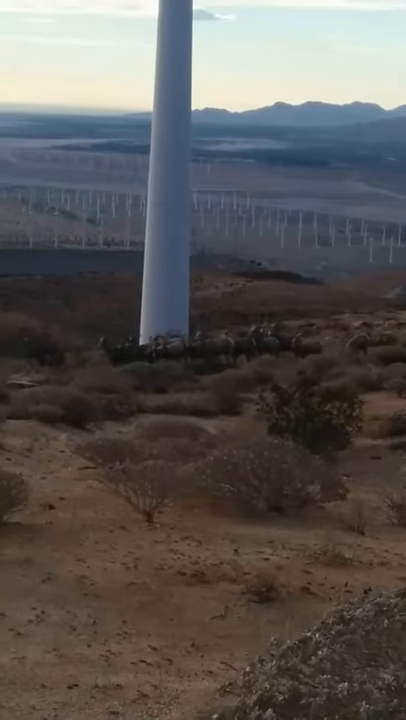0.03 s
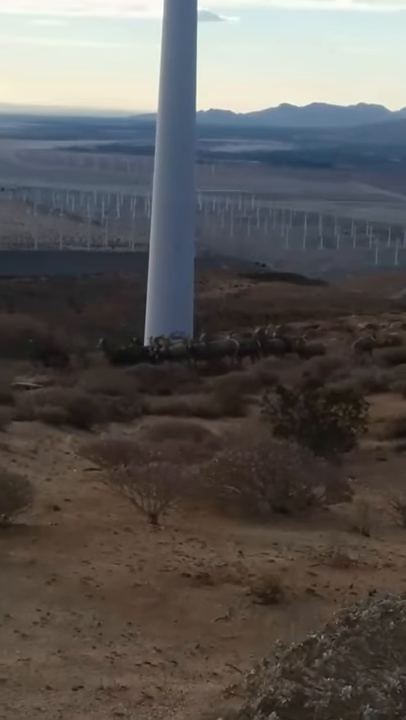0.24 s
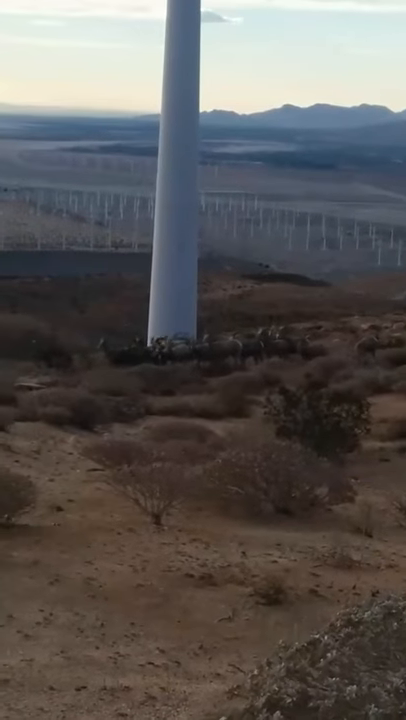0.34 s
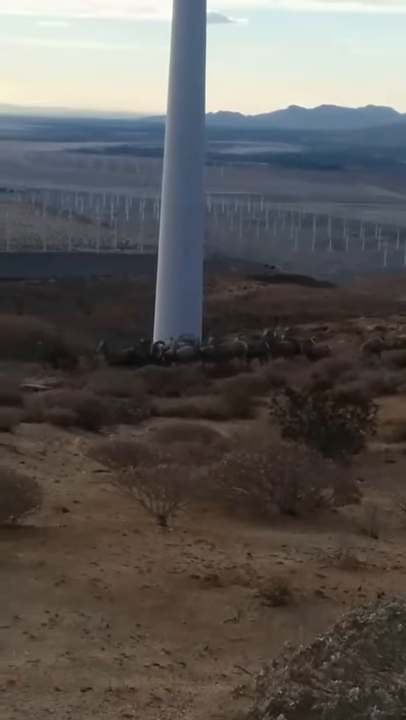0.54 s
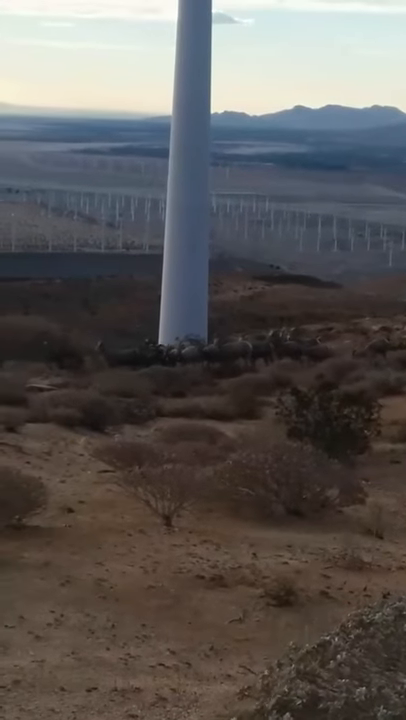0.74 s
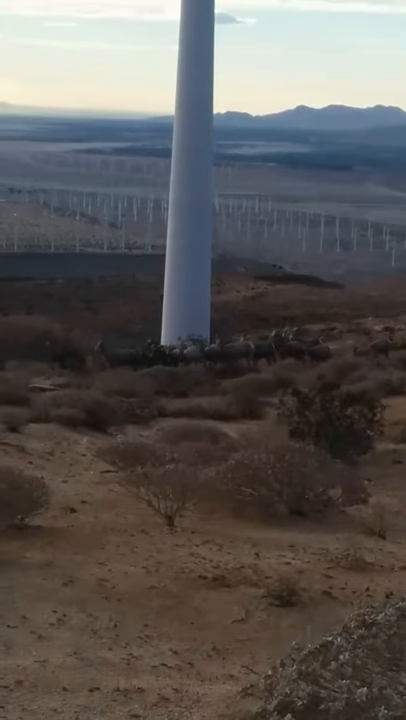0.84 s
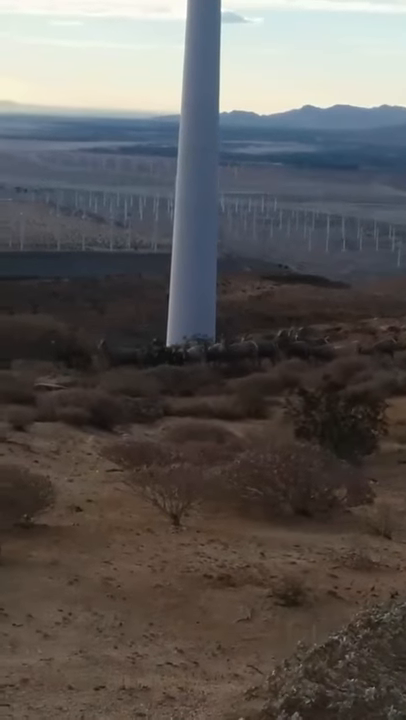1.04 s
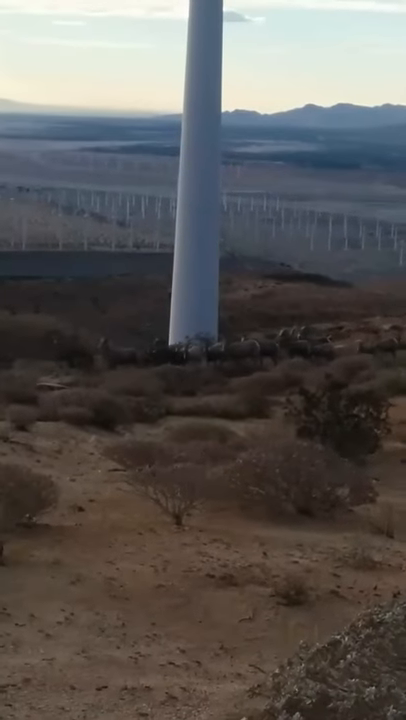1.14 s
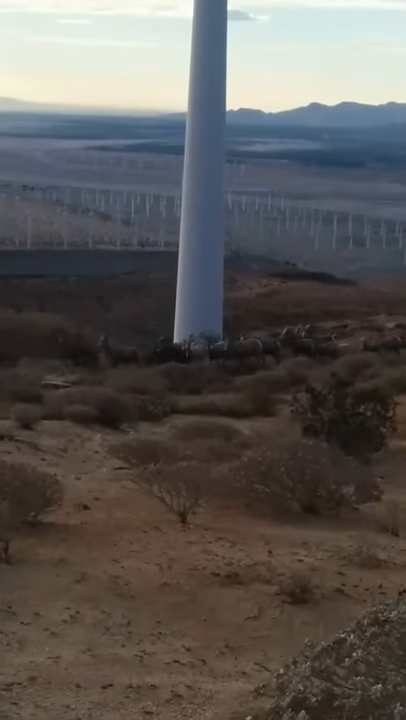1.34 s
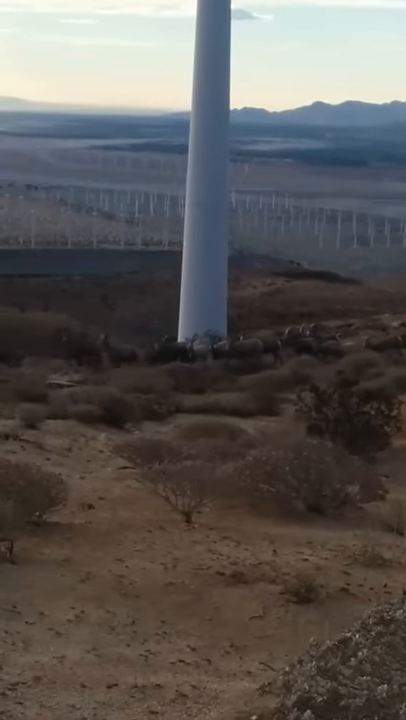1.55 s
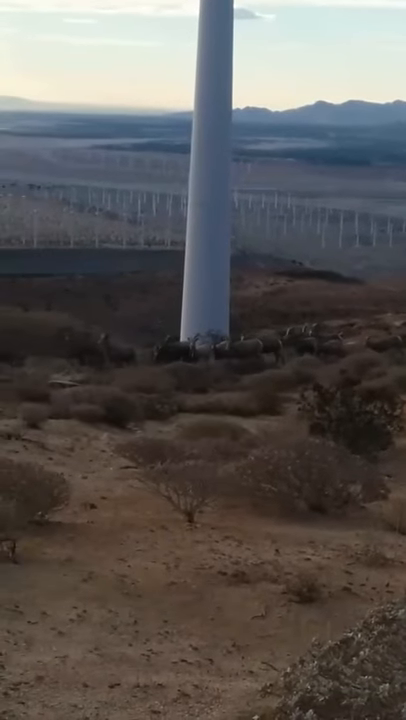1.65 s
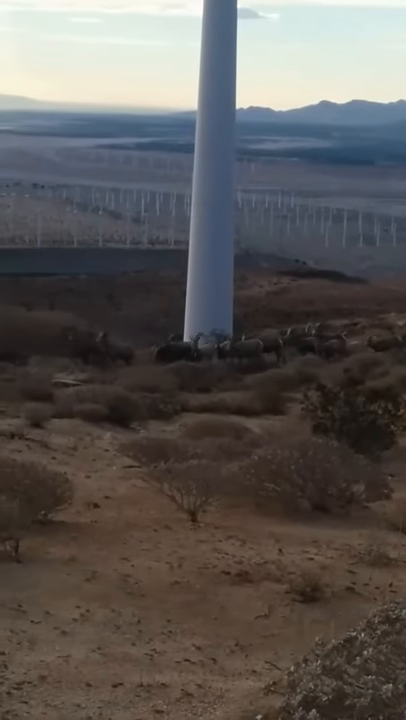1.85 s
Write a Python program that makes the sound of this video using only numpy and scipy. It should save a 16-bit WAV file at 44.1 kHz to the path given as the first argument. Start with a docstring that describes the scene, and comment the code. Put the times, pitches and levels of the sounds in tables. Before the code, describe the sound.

Wind thumps and flutters against the microphone in uneven bursts, strongest near the start. It eases briefly midway, leaving a faint rush of open desert air, then buffets again with a low rumble.

```python
"""On an open desert hillside, among wind turbines, gusty wind buffets a small microphone.
Each eddy (a little whirl of air) hits the microphone's opening with a low thump and a brief flutter;
the strong ones also rasp at its rim and raise a thin hiss. In the lulls a faint rush of distant wind
and machinery remains, with air in the dry brush and a few breathy whistles."""
import sys
import numpy as np
from scipy import signal
from scipy.fft import rfft, irfft, next_fast_len
from scipy.io import wavfile
from scipy.ndimage import uniform_filter1d

SR = 44100
rng = np.random.default_rng(int(sys.argv[2]) if len(sys.argv) > 2 else 0)


def persist_wave(psi):
    """Save psi, clipped to +-1, as 16-bit WAV."""
    counts = np.round(np.clip(psi, -1, 1) * 32767).astype(np.int16)
    wavfile.write(sys.argv[1], SR, np.atleast_2d(counts).T)


N = 83790

# eddies hitting the microphone: time_s, thump_db, flutter_db
EDDIES = [(.078, -41, -48), (.089, -31, -53), (.143, -29, -44), (.18, -33, -59), (.236, -34, -48),
          (.26, -15, -28), (.302, -23, -31), (.334, -18, -28), (.35, -26, -38), (.381, -30, -50),
          (.405, -24, -34), (.423, -32, -46), (.439, -39, -45), (.456, -39, -52), (.519, -42, -57),
          (.559, -43, -56), (.608, -47, -55), (.631, -46, -63), (.694, -36, -49), (.705, -30, -54),
          (.725, -38, -47), (.775, -24, -43), (.788, -19, -32), (.817, -32, -47), (.873, -54, -62),
          (.927, -43, -60), (.948, -49, -58), (.995, -55, -56), (1.182, -54, -55), (1.22, -46, -59),
          (1.272, -20, -44), (1.289, -28, -47), (1.333, -23, -41), (1.357, -31, -51), (1.378, -40, -55),
          (1.46, -40, -58), (1.503, -44, -53), (1.57, -21, -33), (1.597, -24, -42), (1.622, -29, -52),
          (1.728, -52, -60), (1.787, -35, -44), (1.804, -34, -50), (1.835, -32, -50), (1.88, -46, -55)]
# spectrum of the random wobble in thumps and rasps: pitch_hz, level_db
WOBBLE = [(60, 0), (160, -3), (300, -20), (1000, -90)]


def amp(db):
    """Turn decibels into a multiplier."""
    return 10 ** (np.asarray(db) / 20)


def unit(x):
    """Scale x to an average (rms) size of 1."""
    return x / np.sqrt(np.mean(x ** 2) + 1e-20)


def filtered(x, response):
    """Multiply each frequency in x by response(hz)."""
    size = next_fast_len(N + 8192)
    return irfft(rfft(x, size) * response(np.fft.rfftfreq(size, 1 / SR)), size)[:N]


def coloured(x, spectrum):
    """Shape x with (pitch_hz, level_db) points, then scale it to size 1."""
    pitch_hz, level_db = np.transpose(spectrum)
    return unit(filtered(x, lambda hz: amp(np.interp(np.log(hz + 1), np.log(pitch_hz), level_db))))


def noise(spectrum):
    """Steady noise with the given spectrum."""
    return coloured(rng.standard_normal(N), spectrum)


def patchy(spectrum, depth_db):
    """Noise whose level drifts in patches of time and pitch."""
    grid = signal.stft(rng.standard_normal(N), nperseg=1024)[2]
    patches = uniform_filter1d(rng.standard_normal(grid.shape), size=5, axis=0)
    patches = uniform_filter1d(patches, size=7, axis=1)
    uneven = signal.istft(grid * amp(depth_db * unit(patches)), nperseg=1024)[1][:N]
    return coloured(uneven, spectrum)


def swells(times, levels_db, rise_s, fall_s, lead_s, wake_db, wake_s):
    """Loudness of passing eddies: each swells, falls quickly and leaves a weaker tail, its wake."""
    age = np.arange(N) / SR - times[:, None] + lead_s
    before, after = np.minimum(age, 0), np.maximum(age, 0)
    rise = np.exp(1 - np.hypot(1, before / rise_s * 2))
    fall = np.exp(1 - np.hypot(1, after / fall_s))
    wake = amp(wake_db) * np.exp(-after / wake_s)
    each = amp(levels_db)[:, None] * rise * np.maximum(fall, wake)
    return np.sqrt(np.sum(each ** 2, axis=0))


def breeze():
    """Distant wind and machinery, air in dry brush and a rumble of small eddies rise and fall together."""
    # strength of the breeze: time_s, level_db
    strength = [(0, .5), (.2, 1), (.45, 3), (.6, 1.5), (.67, -.5), (.93, .5), (1.06, -2.2), (1.22, -1.5),
                (1.4, 2), (1.5, 1.5), (1.72, .5), (1.83, 2.5), (1.9, 2.5)]
    # spectra of the three sounds: pitch_hz, level_db
    distant_spectrum = [(25, -19), (60, -12), (150, -6), (280, 3), (400, -8), (550, -6), (750, -9),
                        (980, -10.5), (1180, -21), (1500, -17), (2050, -24), (2500, -25), (3000, -31),
                        (4200, -40), (8000, -70)]
    brush_spectrum = [(1500, -30), (2150, -12), (2400, 0), (2650, -1), (2950, -5), (3200, -12), (3800, -15),
                      (4500, -30)]
    rumble_spectrum = [(25, -15), (45, -3), (85, 0), (170, -2), (260, -4), (370, -12), (490, -11),
                       (650, -24), (1000, -50), (2500, -100)]
    strength_db = np.interp(np.arange(N) / SR, *np.transpose(strength))
    distant = amp(-62.7) * patchy(distant_spectrum, depth_db=3.5)
    brush = amp(-81.5) * patchy(brush_spectrum, depth_db=4.5)
    rumble = amp(-61 + 3.2 * strength_db) * noise(rumble_spectrum)
    return amp(strength_db) * (distant + brush) + rumble


def thumps():
    """Each eddy makes a few uneven swings of pressure, fast at its front and slow in its wake."""
    wake_hz, slowing_s, top_hz = 88, .009, 290
    t, out = np.arange(N) / SR, np.zeros(N)
    for time_s, thump_db, flutter_db in EDDIES:
        front_hz = 162 * 2 ** ((flutter_db - thump_db + 14) / 36)  # brighter eddy, faster front
        front_share = (1 - np.tanh((t - time_s) / slowing_s + 1 / 4)) / 2
        rate_hz = wake_hz + (front_hz - wake_hz) * front_share
        turns = np.cumsum(rate_hz * np.exp(.37 * noise(WOBBLE))) / SR + rng.random()
        loudness = swells(np.array([time_s]), thump_db + np.array([.9]),
                          rise_s=.0062, fall_s=.0075, lead_s=.003, wake_db=-20, wake_s=.028)
        out += loudness * np.sqrt(2) * np.sin(2 * np.pi * turns)
    return filtered(out, lambda hz: 1 / np.sqrt(1 + (hz / top_hz) ** 12))


def flutter():
    """Each eddy briefly shakes the pressure at an uneven rate."""
    # spectrum of the flutter: pitch_hz, level_db
    spectrum = [(100, -25), (165, -2), (230, 2), (330, -1), (385, -14), (480, -10), (620, -19), (900, -45),
                (2000, -100)]
    wider = [(hz, min(db + 6, 0)) for hz, db in spectrum]
    swirl = noise(spectrum)
    for _ in range(3):  # make the swings nearly equal in strength
        phase = np.angle(signal.hilbert(swirl))
        swirl = coloured(np.cos(phase), wider)
    times, _, flutter_db = np.transpose(EDDIES)
    return swirl * swells(times, flutter_db + 2,
                          rise_s=.007, fall_s=.006, lead_s=.003, wake_db=-17, wake_s=.036)


def hiss():
    """Eddies raise a thin hiss that grows with their strength."""
    # spectrum of the hiss: pitch_hz, level_db
    spectrum = [(3000, -20), (5200, -10), (6300, -3), (7500, 0), (9500, -3), (12000, -10), (15500, -18)]
    times, thump_db, _ = np.transpose(EDDIES)
    hiss_db = -79.5 + .5 * (thump_db - thump_db.max())
    loudness = swells(times, hiss_db, rise_s=.02, fall_s=.05, lead_s=.002, wake_db=-12, wake_s=.11)
    return loudness * noise(spectrum)


def whistles():
    """The breeze whistles faintly: short swells of noise close to one pitch."""
    # breathy whistles: peak_s, pitch_hz, level_db
    notes = [(.12, 2500, -75), (.58, 2500, -73), (.745, 2480, -73), (1.41, 2550, -74), (1.835, 2400, -69),
             (1.865, 2550, -74)]
    swell_s, width_hz = .02, 55
    t, out = np.arange(N) / SR, np.zeros(N)
    for peak_s, pitch_hz, level_db in notes:
        tone = filtered(rng.standard_normal(N), lambda hz: 1 / (1 + ((hz - pitch_hz) / width_hz) ** 2))
        out += amp(level_db) * unit(tone) * np.exp(-((t - peak_s) / swell_s) ** 2)
    return out


def rasps():
    """The fastest eddies tear raggedly at the rim of the microphone's opening."""
    # eddies at the rim: time_s, low_db, high_db
    tears = [(.147, -62, -69), (.183, -60, -78), (.258, -52, -57), (.3, -51, -63), (.332, -43, -61),
             (.4, -56, -66), (.712, -59, -74), (.789, -42, -61), (1.272, -57, -71), (1.329, -56, -64),
             (1.385, -60, -78), (1.495, -60, -76), (1.567, -49, -64), (1.64, -61, -76)]
    # spectra of the low and high rasp: pitch_hz, level_db
    low_spectrum = [(300, -22), (480, 0), (680, 0), (800, -5), (980, -9), (1150, -20), (1600, -25),
                    (2500, -45), (5000, -90)]
    high_spectrum = [(600, -20), (1000, -3), (1500, 0), (2050, -4), (2500, 4), (2850, 0), (3200, -12),
                     (3900, -15), (4400, -33), (9000, -60)]
    times, low_db, high_db = np.transpose(tears)
    shape = dict(rise_s=.011, fall_s=.010, lead_s=.001, wake_db=-19, wake_s=.04)
    ragged = unit(amp(2.5 * noise(WOBBLE)))
    low = swells(times, low_db, **shape) * noise(low_spectrum)
    high = swells(times, high_db, **shape) * noise(high_spectrum)
    return ragged * (low + high)


def scene():
    """All the wind at one microphone."""
    return (breeze() + thumps() + flutter() + hiss() + whistles() + rasps())[None]


def record(dry):
    """The recorder cuts the deep bass, adds its own faint noise and drops the highest treble."""
    # spectrum of the recorder's noise: pitch_hz, level_db
    spectrum = [(100, 0), (4000, 0), (8000, 0), (15500, -1.5)]
    low_cut_hz, top_hz = 43, 15700
    thinned = signal.sosfilt(signal.butter(4, low_cut_hz, "highpass", fs=SR, output="sos"), dry[0])
    return filtered(thinned + amp(-82.7) * noise(spectrum), lambda hz: hz < top_hz)[None]


dry = scene()
out = record(dry)
persist_wave(out)
```